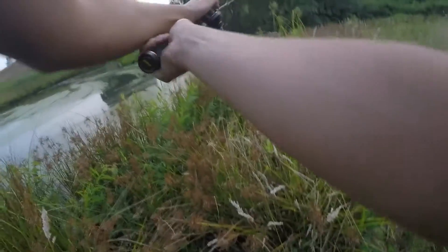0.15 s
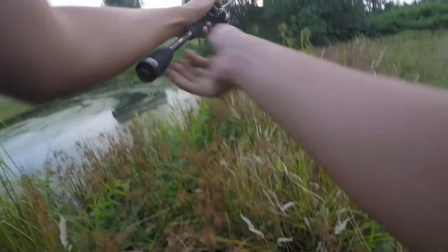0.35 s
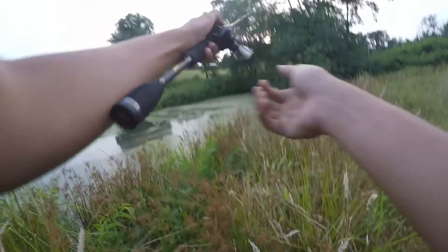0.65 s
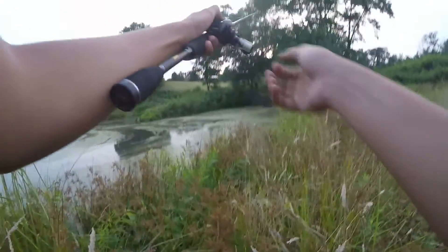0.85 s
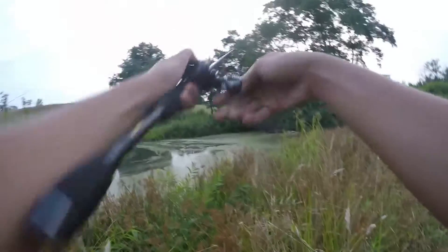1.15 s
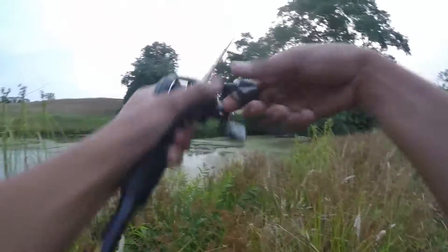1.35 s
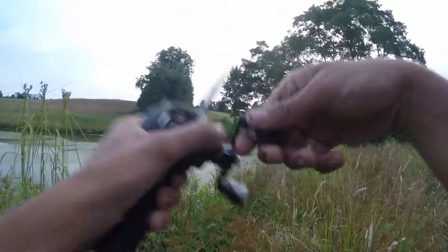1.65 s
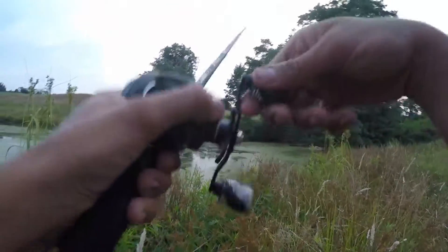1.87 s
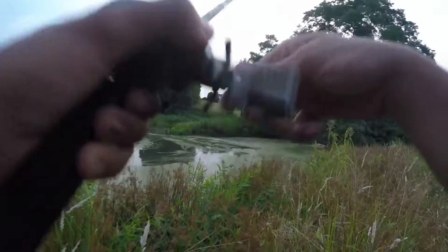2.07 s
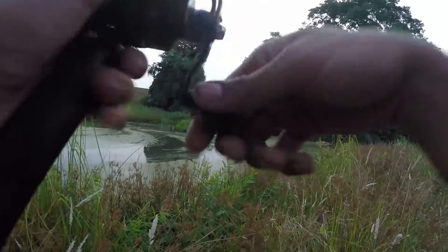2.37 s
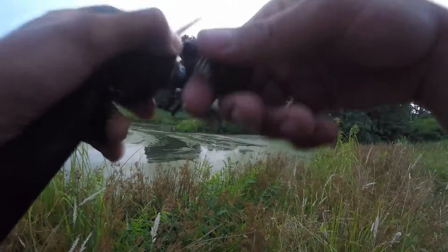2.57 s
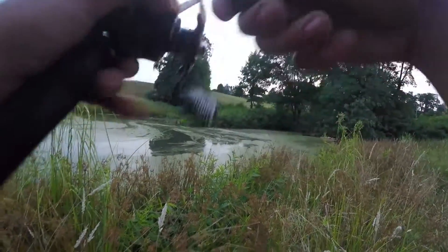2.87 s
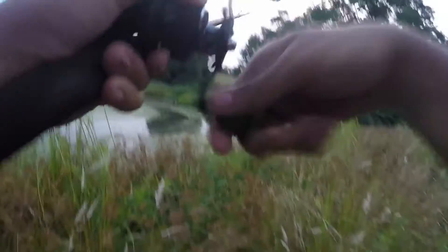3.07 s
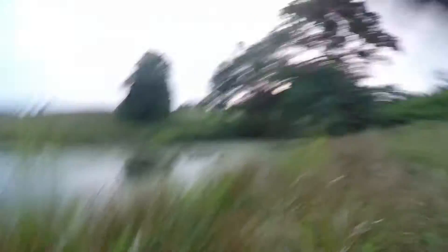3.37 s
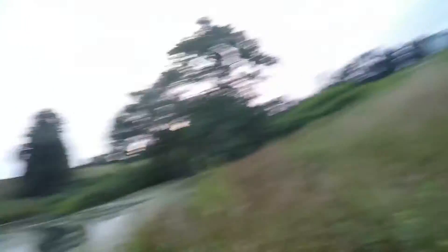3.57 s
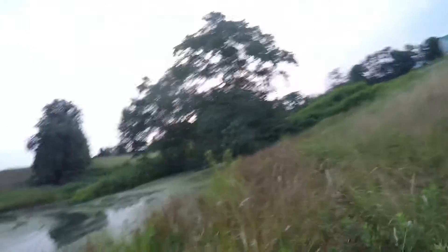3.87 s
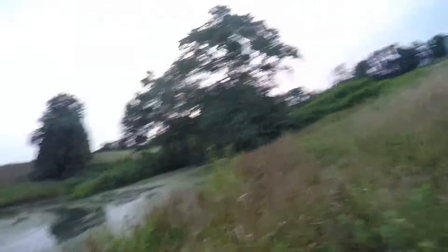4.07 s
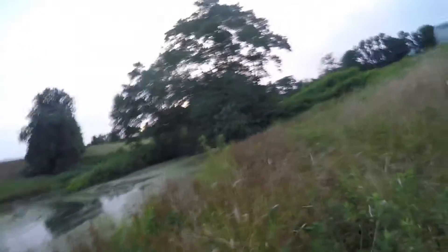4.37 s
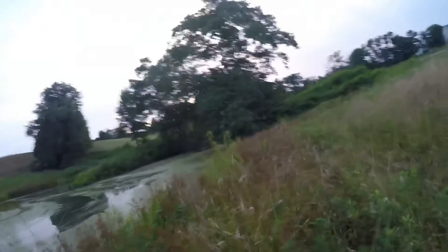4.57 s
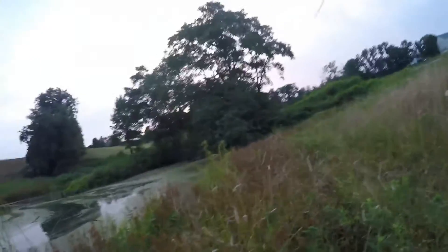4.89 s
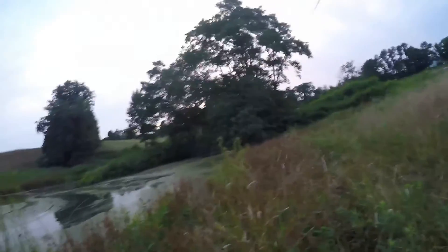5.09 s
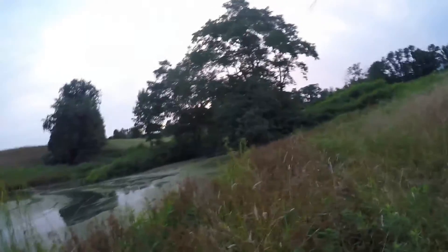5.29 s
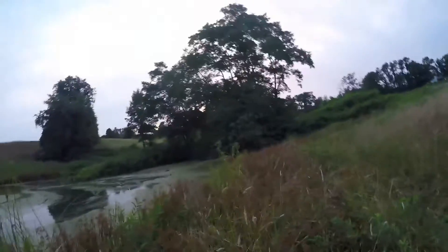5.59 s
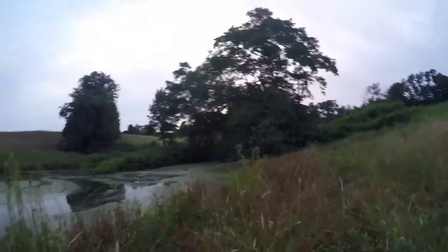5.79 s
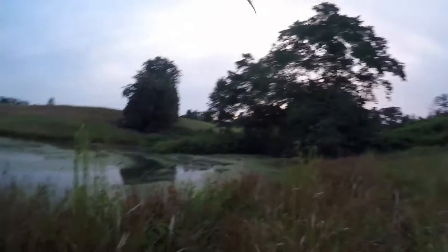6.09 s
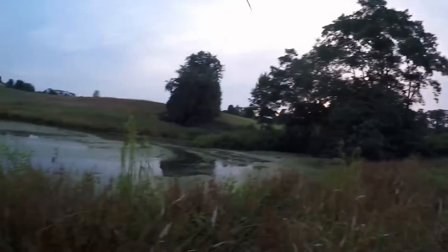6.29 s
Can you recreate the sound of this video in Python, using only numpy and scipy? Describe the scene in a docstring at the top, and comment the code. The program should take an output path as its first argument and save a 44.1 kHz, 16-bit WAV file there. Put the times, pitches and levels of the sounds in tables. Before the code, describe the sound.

A fishing reel's spool whirrs softly after a cast, slows and stops. The clutch snaps in sharply, then fingers rub the grip and loose parts tick. The rod butt thumps the chest once as winding begins: jerky strokes of hoarse, gritty gear whine with scattered sharp clicks. Everything is close to a chest-worn microphone, with low wind and body rumble over a quiet meadow hiss.

```python
"""A spool whirrs free after a cast, slows and stops: a fishing reel, close to a chest camera beside a pond.
The clutch snaps in, fingers rub on the handle and loose parts tick. Then line is wound in jerky strokes,
the gear teeth whining through the reel's frame, and the rod butt thumps the chest once.
Wind and body movement rumble in the microphone over a quiet meadow hiss."""
import sys
import numpy as np
from scipy.fft import rfft, irfft, next_fast_len
from scipy.io import wavfile
from scipy.ndimage import uniform_filter1d, map_coordinates

SR = 44100
rng = np.random.default_rng(int(sys.argv[2]) if len(sys.argv) > 2 else 0)


def dump(signal):
    """Clip the signal to [-1, 1] and save it as 16-bit WAV at the path in sys.argv[1]."""
    limited = np.clip(np.atleast_2d(signal).T, -1, 1)
    pcm = np.round(limited * 32767).astype(np.int16)
    wavfile.write(sys.argv[1], SR, pcm)


N = 284216
TIME = np.arange(N) / SR
HIT_TIME = np.arange(4096) / SR  # seconds since an impact


def amp(db):
    return 10 ** (np.asarray(db) / 20)


def unit(x):
    return x / np.sqrt(np.mean(x ** 2) + 1e-20)


def phase_of(hz):
    return 2 * np.pi * np.cumsum(hz) / SR


def gain_at(spectrum, hz):
    """Gain between (Hz, dB) points on a log axis."""
    points_hz, db = np.transpose(spectrum)
    return amp(np.interp(np.log(hz + 1), np.log(points_hz + 1), db))


def curves(rows):
    """One value per sample for each column after the time."""
    times, *columns = np.transpose(rows)
    return [np.interp(TIME, times, column) for column in columns]


def wobble(rate):
    """A smooth random curve, rate knots a second."""
    return map_coordinates(rng.standard_normal(int(N * rate / SR) + 4), [TIME * rate])


def filtered(x, response):
    """x times a complex response of frequency."""
    size = next_fast_len(N + SR // 2)
    return irfft(rfft(x, size) * response(np.fft.rfftfreq(size, 1 / SR)), size)[..., :N]


def hiss(spectrum):
    """Coloured noise of rms 1."""
    return unit(filtered(rng.standard_normal(N), lambda hz: gain_at(spectrum, hz)))


def band(hz, centre_hz, width_hz):
    """A causal resonance of gain 1 at its centre."""
    return 1j * hz * width_hz / (centre_hz ** 2 - hz ** 2 + 1j * hz * width_hz)


def resonate(x, centre_hz, width_hz):
    """x passed twice through one resonance."""
    return filtered(x, lambda hz: band(hz, centre_hz, width_hz) ** 2)


# The free run, close to the microphone. Each row: time in seconds, whirr in dB, hum in Hz, hum in dB.
SPOOL_RUN = [(0, -52, 239.3, -62), (.6, -56.5, 178.8, -73), (.93, -60, 142.7, -83.5)]
# The spool's resonances at full speed. Each row: centre in Hz, width in Hz, relative level in dB.
SPOOL_MODES = [(2430, 1700, 4), (4120, 1900, 1), (7640, 2000, 0), (10350, 1600, 0), (13723, 3400, -9.5)]
# A faint, rough falling tone. Each row: time in seconds, pitch in Hz, level in dB.
SPOOL_WHIZZ = [(.66, 5100, -68), (.88, 3750, -64.5), (.945, 1600, -66)]


def spool(stop_s=0.945, sag_power=0.3):
    """The free spool slows down; its bearings rattle in regular bursts, hum and whizz."""
    whirr_db, hum_hz, hum_db = curves(SPOOL_RUN)
    phase = phase_of(hum_hz)
    bursts = (.5 + .5 * np.cos(phase / 4)) ** 6
    rattle = unit(1 + 0.42 * amp(1.8 * wobble(27)) * bursts) * rng.standard_normal(N)
    slowed = np.cumsum((hum_hz / hum_hz[0]) ** sag_power)
    whirr = np.zeros(N)
    for hz, width, db in SPOOL_MODES:
        ring = amp(db + 2.2 * wobble(21.5)) * resonate(rattle, hz, width)
        whirr += map_coordinates(ring, [slowed]) if hz < 9000 else ring  # lower modes sink with the speed
    whizz_hz, whizz_db = curves(SPOOL_WHIZZ)
    partials = sum(np.sin(ratio * phase_of(whizz_hz)) for ratio in (1, 1.6))
    whizz = unit(amp(1.8 * wobble(29.7)) * wobble(500) * partials)
    hum = amp(hum_db + 3.1 * wobble(31.2)) * np.sin(phase)
    return (amp(whirr_db) * unit(whirr) + amp(whizz_db) * whizz + hum) * (TIME < stop_s)


# Wind on the microphone. Each row: frequency in Hz, relative noise density in dB.
WIND_SPECTRUM = [(10, -41), (30, 0), (90, -5), (145, -29), (250, -25.5), (400, -44.5)]
# The body's push on the chest harness. Each row: time in seconds, level in dB.
BODY_SWAY = [(2.4, -52.5), (3.35, -37), (3.55, -32.5), (3.7, -51.5), (3.9, -34), (4.25, -36.5),
             (5.05, -41.5), (5.55, -33), (6, -43.5)]


def rumble():
    """Wind buffets the microphone while the body sways under it."""
    wind = amp(-55) * unit(amp(1.4 * wobble(4.9)) * hiss(WIND_SPECTRUM))
    sway = unit(resonate(rng.standard_normal(N), centre_hz=22.228, width_hz=22.1))
    return wind + amp(curves(BODY_SWAY)[0]) * sway


# The meadow around the pond. Each row: frequency in Hz, relative noise density in dB.
MEADOW_SPECTRUM = [(59, 0.5), (100, 4.5), (214, -11), (541, -7), (1430, -18), (5280, -24.5), (13900, -35),
                   (15500, -50.5)]
# A thin high band, perhaps insects. Each row: time in seconds, level in dB.
THIN_HISS = [(1.6, -94), (2.1, -68.5), (3.1, -70), (4, -89)]


def meadow():
    """A quiet, wavering hiss; a thin band near 10 kHz comes and goes."""
    air = amp(-55 + 2.2 * wobble(2.92)) * hiss(MEADOW_SPECTRUM)
    thin = unit(resonate(rng.standard_normal(N), centre_hz=9550, width_hz=1868))
    return air + amp(curves(THIN_HISS)[0]) * thin


# Loose parts, close by. Each row: start in seconds, pitch in Hz, level in dB.
PART_RINGS = [(.355, 554, -39.5), (1.457, 3920, -43), (1.457, 2460, -50)]


def loose_parts(t60=0.11):
    """Loose parts ring on briefly, each with one rough tone."""
    out, t = np.zeros(N + SR), HIT_TIME
    for start, hz, db in PART_RINGS:
        rough = 1 + 6.5 * uniform_filter1d(rng.standard_normal(len(t)), size=60)
        envelope = amp(db - 60 * t / t60) * (1 - np.exp(-t / 0.0028))
        out[round(start * SR):][:len(t)] += envelope * rough * np.sin(2 * np.pi * hz * t)
    return out[:N]


# Clutch, handle and rod, right at the camera.
# Each row: start in seconds, crack peak in dB, crack centre in Hz, knock gain in dB.
REEL_TICKS = [(1.0062, -43, 3500, -50), (1.2926, -24, 5000, -58), (1.2966, -19, 4273, -48),
              (1.2998, -19, 4070, -54), (1.302, -11, 3050, -45), (1.4546, -30, 3950, -47.5),
              (2.159, -39, 1991, -52), (2.192, -42, 3566, -52), (2.2746, -34, 3380, -69),
              (2.391, -42, 7500, -65), (2.455, -36, 3775, -53), (2.5285, -38, 2986, -46),
              (2.5436, -32, 2700, -46), (2.677, -35, 878.5, -55), (2.793, -29, 2860, -53),
              (2.973, -32.5, 1050, -46.5), (3.0175, -29.5, 980, -44), (3.138, -35, 640, -41),
              (3.228, -34.5, 1436, -45.5), (3.276, -33, 2360, -45), (3.3704, -26.5, 2408, -41),
              (3.545, -34, 1600, -42), (4.037, -36, 1800, -50), (4.239, -23, 2340, -56),
              (4.353, -39, 5200, -60), (4.488, -29, 4470, -56), (4.503, -21, 4600, -30),
              (4.5424, -23.5, 3304, -38.5), (4.915, -41, 4004, -65), (5.1169, -30.5, 3437, -65),
              (5.338, -40, 5597, -45), (5.448, -31, 4800, -55), (5.6289, -27.5, 3405, -45),
              (5.6525, -28, 3460, -60), (5.6533, -16, 3500, -39.5), (5.706, -33.5, 4778, -52),
              (5.7285, -19, 3923, -40), (5.7456, -25.5, 2160, -39), (5.81, -33, 4200, -59.5),
              (5.8245, -20.5, 3250, -39.5), (6.1342, -20.5, 4450, -42), (6.1378, -17, 3729, -39.5),
              (6.1561, -25, 2385, -45), (6.2003, -31, 4790, -43), (6.2175, -27, 3220, -53)]
# The rod butt's modes. Each row: pitch in Hz, relative level in dB, seconds to fall 60 dB.
ROD_MODES = [(301, 18, 0.0096), (487, 7, 0.032), (587, -1.5, 0.084)]


def ticks():
    """Each tick is a few milliseconds of crack around its own centre, and a low knock in the rod."""
    out, t = np.zeros(N + SR), HIT_TIME
    freqs = np.fft.rfftfreq(len(t), 1 / SR)
    envelope = (amp(-60 * t / 0.004) + 0.024 * amp(-60 * t / 0.044)) * (1 - np.exp(-t / 0.00078)) ** 2
    for start, peak_db, centre, knock_db in REEL_TICKS:
        colour = band(freqs, centre, 0.84 * centre) ** 2 + 0.044 * band(freqs, 7700, 6800)
        crack = irfft(rfft(envelope * rng.standard_normal(len(t))) * colour)
        crack /= np.abs(crack).max()
        grip = amp(rng.normal(0, 1.0))  # the hand's hold shifts the rod's pitch
        knock = sum(amp(db + rng.normal(0, 1.5) - 60 * t / t60) * np.sin(2 * np.pi * hz * grip * t)
                    for hz, db, t60 in ROD_MODES)
        knock *= 1 - np.exp(-t / 0.0022)
        out[round(start * SR):][:len(t)] += amp(peak_db) * crack + amp(knock_db) * knock
    return out[:N]


# The reel frame's broad colour, heard up close. Each row: frequency in Hz, relative level in dB.
FRAME_SPECTRUM = [(120, -14), (250, -10.5), (480, -5.5), (800, -6.5), (1500, -8), (1900, -4), (4800, -6.5),
                  (6500, -17.5), (15500, -28)]
# Rubs on the grip. Each row: peak time in seconds, rise in seconds, peak in dB, fade in dB a second.
GRIP_RUBS = [(1.275, 0.00386, -51, 301.5), (1.679, 0.03162, -60, 200.5), (1.9, 0.12, -60, 14),
             (2.35, 0.018, -60.5, 40), (2.9, 0.049, -54, 37), (3.22, 0.42, -52.5, 65),
             (3.335, 0.02083, -47.5, 77), (4.059, 0.0616, -54.5, 56), (6.13, 0.051, -44.5, 304)]


def hands(rise_db=24.5):
    """Fingers and cloth rub the grip: grainy noise in the colour of the frame."""
    level = np.zeros(N)
    for peak_s, rise_s, db, fade in GRIP_RUBS:
        since = TIME - peak_s
        level += amp(db + np.where(since < 0, rise_db * since / rise_s, -fade * since))
    grain = amp(2.5 * wobble(40) + 3.1 * wobble(300))
    return level * grain * hiss(FRAME_SPECTRUM)


# Winding in front of the chest. Each row: start in seconds, end in seconds, level between tugs in dB.
CRANK_STROKES = [(3.393, 3.489, -33), (3.688, 4.032, -43), (4.187, 4.321, -42.5), (4.352, 4.463, -43),
                 (4.492, 4.517, -34.5), (4.544, 4.907, -43.5), (4.939, 5.11, -42.5), (5.152, 5.351, -41.5),
                 (5.361, 5.686, -42.5), (5.696, 6.099, -44.5), (6.216, 6.501, -46)]
# Tugs of the hand. Each row: peak time in seconds, half length in seconds,
# top tooth rate in Hz when inside a stroke, lift in dB.
HAND_TUGS = [(3.429, 0.05615, 2257, 6), (3.694, 0.039, 2825, 1.5), (3.795, .03, 1941, 4),
             (3.852, 0.035794, 3266, 11.5), (3.991, 0.045843, 3790, 9.5), (4.211, 0.036, 2704, 5.5),
             (4.271, 0.043645, 2740, 5.5), (4.404, 0.04811, 3465, 9.5), (4.584, 0.034, 2559, 5),
             (4.676, 0.043106, 2026, 6), (4.776, 0.04073, 2332, 10), (4.856, 0.04, 2391, 6.5),
             (4.982, 0.06225, 3668, 9.5), (5.055, 0.03015, 2774, 8), (5.183, 0.040085, 3220, 6),
             (5.262, 0.05047, 2723, 5.5), (5.328, .035, 3430, 5), (5.404, 0.047466, 3644, 8),
             (5.529, 0.0483, 3280, 6), (5.774, 0.063314, 3634, 7), (5.848, 0.052795, 3422, 5.5),
             (5.957, 0.08125, 3740, 8), (6.036, 0.03702, 3046, 6), (6.314, 0.06212, 3394, 7.5),
             (6.41, 0.04967, 2321, 4.5)]


def winding(rest_hz=1306, cruise_hz=1772, rest_db=-61, take_up_s=0.029, let_go_s=0.026):
    """Strokes lift the tooth rate and level from rest; tugs add load and arch both higher."""
    def ease(u):
        return np.sin(np.pi / 2 * np.clip(u, 0, 1)) ** 2

    tooth_hz, level_db, load_db = np.full(N, float(rest_hz)), np.full(N, float(rest_db)), np.zeros(N)
    for start, end, db in CRANK_STROKES:
        turning = ease((TIME - start) / take_up_s + .5) * ease((end - TIME) / let_go_s + .5)
        tooth_hz += (cruise_hz - rest_hz) * turning
        level_db += (db - rest_db) * turning
    for peak_s, half_s, hz, db in HAND_TUGS:
        arch = ease(1 - np.abs(TIME - peak_s) / half_s)
        tooth_hz += (hz - cruise_hz) * arch
        load_db += db * arch
    return tooth_hz, level_db + load_db, load_db


def squeaks(count):
    """Scattered short arching chirps from dry teeth and bearings."""
    out, arch = np.zeros(N + SR), np.sin(np.linspace(0, np.pi, 600))
    for when, pitch, bend, size in rng.random((count, 4)):
        hz = 1800 * 3 ** pitch * (1 + 0.12644 * bend * arch)
        out[int(when * N):][:len(arch)] += (size * arch) ** 2 * np.sin(phase_of(hz))
    return unit(out[:N])


# The reel frame's resonances. Each row: centre in Hz, width in Hz, lift in dB.
FRAME_MODES = [(1100, 120, 5.5), (2025, 135, 5), (3273, 146, 6.5), (3520, 160, 4), (3920, 97, 4.5),
               (4620, 370, 4)]


def frame(hz):
    """The reel frame lifts whatever falls on its resonances."""
    return 1 + sum((amp(db) - 1) * band(hz, centre, width) for centre, width, db in FRAME_MODES)


# The gear whine, close to the microphone. Each row: multiple of the tooth rate, relative level in dB.
MESH_ORDERS = [(.152, -3), (0.301, -10.5), (0.491, -6.5), (1.001, 1.5), (2.0, 1), (3.0, -2)]


def gears(whine_top_hz=6300):
    """Tooth impacts whine hoarsely over gritty friction; both ring the frame."""
    tooth_hz, level_db, load_db = winding()
    phase = phase_of(tooth_hz * (1 + .035 * wobble(300) + .03 * wobble(45)))
    whine = sum(amp(db + 3.5 * wobble(45)) * (1 + .8 * wobble(300)) * np.sin(order * phase)
                for order, db in MESH_ORDERS)
    whine = filtered(whine, lambda hz: gain_at(FRAME_SPECTRUM, hz) / (1 + (hz / whine_top_hz) ** 5))
    grit = unit(amp(1.3 * wobble(200) + 1.1 * wobble(35)) * hiss(FRAME_SPECTRUM))
    bite = amp(0.61 * load_db - 0.5)  # teeth sing out more under load
    mesh = (grit + bite * whine + amp(-9.5) * squeaks(count=2600)) / np.sqrt(1 + bite ** 2)
    engaged = TIME > CRANK_STROKES[0][0] - .1
    return amp(level_db) * engaged * unit(filtered(mesh, frame))


def butt_thump(start_s=3.483, db=-20.5, hz=172, t60=0.035):
    """The rod butt thumps the chest: one low, quickly damped tone."""
    out, t = np.zeros(N), HIT_TIME
    out[round(start_s * SR):][:len(t)] -= amp(db - 60 * t / t60) * np.sin(2 * np.pi * hz * t)
    return out


# Two low tones late in the winding.
# Each row: start in seconds, length in seconds, first pitch in Hz, last pitch in Hz, level in dB.
RISING_TONES = [(5.552, 0.1, 575, 798, -45), (5.624, 0.074928, 600, 838.5, -44.5)]


def rising_tones():
    """Short soft tones glide upward."""
    out = np.zeros(N)
    for start, length, from_hz, to_hz, db in RISING_TONES:
        progress = np.arange(round(length * SR)) / (length * SR)
        tone = np.sin(phase_of(from_hz + (to_hz - from_hz) * progress))
        out[round(start * SR):][:len(tone)] += amp(db) * np.sqrt(np.sin(np.pi * progress)) * tone
    return out


def scene():
    """The reel and the pondside, in mono from the chest."""
    cast = spool() + rumble() + meadow() + loose_parts()
    return (cast + ticks() + hands() + gears() + butt_thump() + rising_tones())[None]


def record(dry, peak_hz=14600, shelf_hz=15400, top_hz=16400):
    """The microphone peaks near the top, then falls away; the camera keeps nothing above its band limit."""
    def response(hz):
        peak = 1 + amp(-6.5) * band(hz, peak_hz, width_hz=1000)
        return peak * amp(-22 * (hz > shelf_hz)) * (hz < top_hz)

    return filtered(dry, response)


dry = scene()
out = record(dry)
dump(out)
```